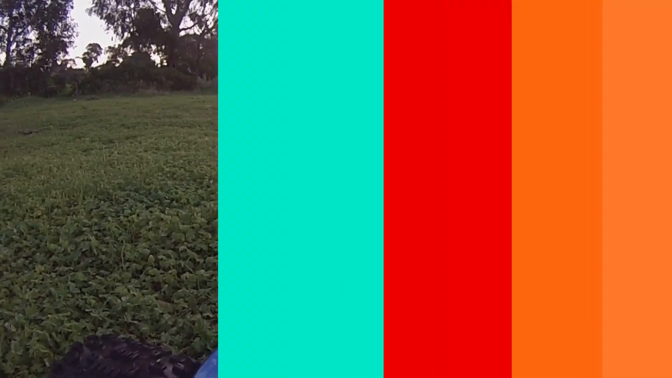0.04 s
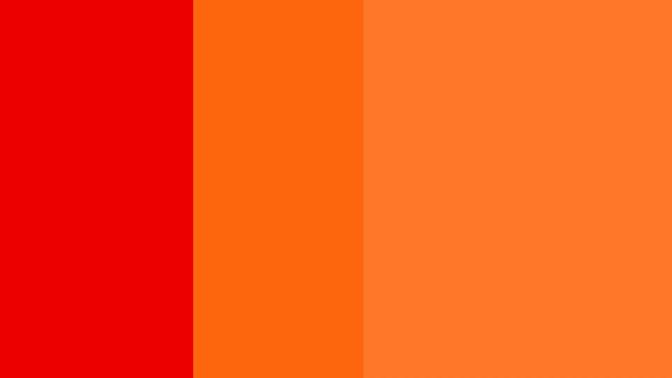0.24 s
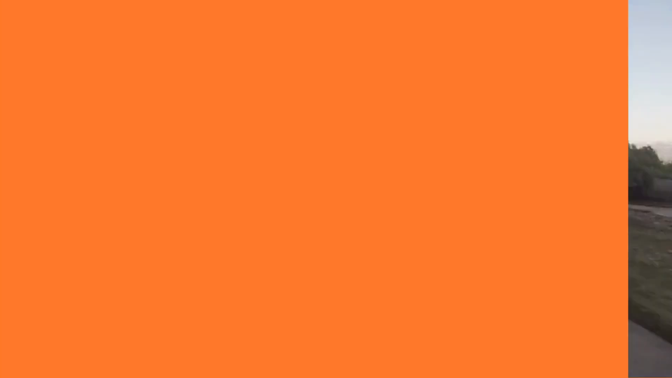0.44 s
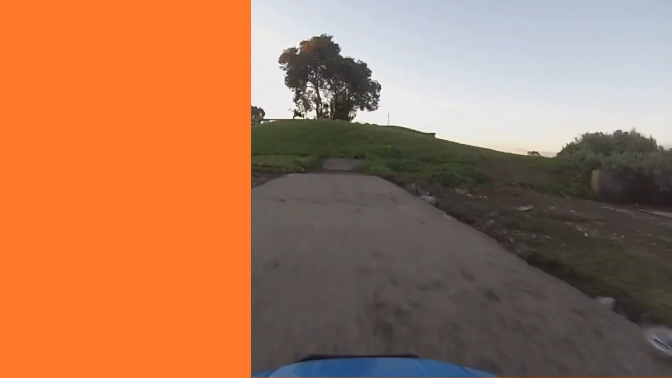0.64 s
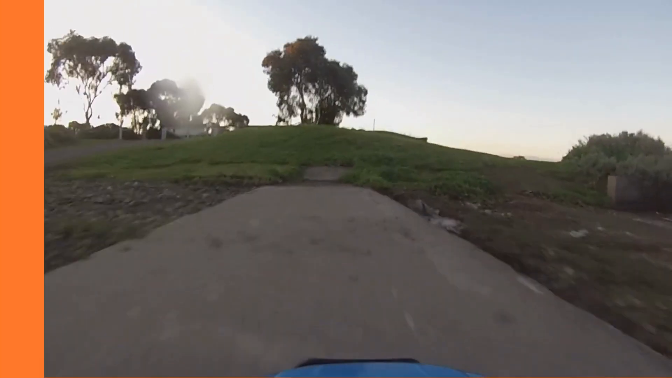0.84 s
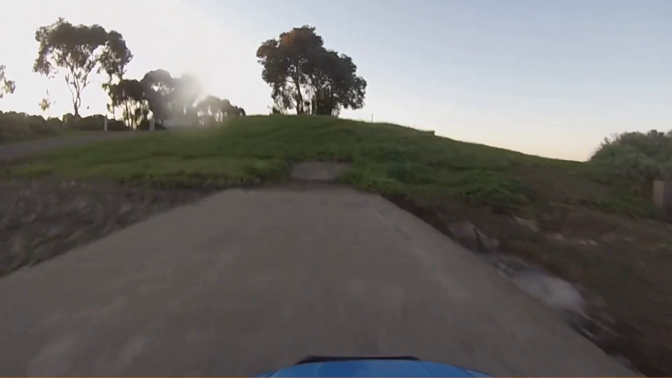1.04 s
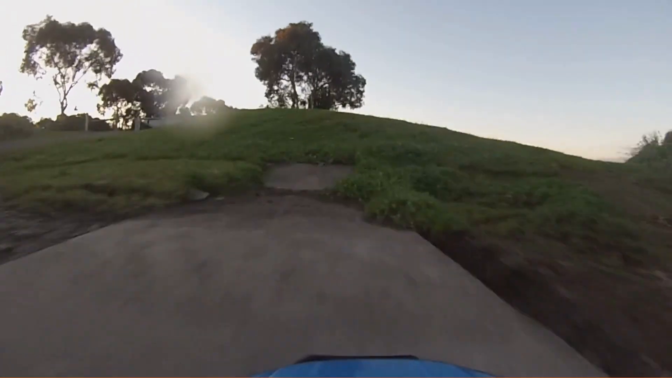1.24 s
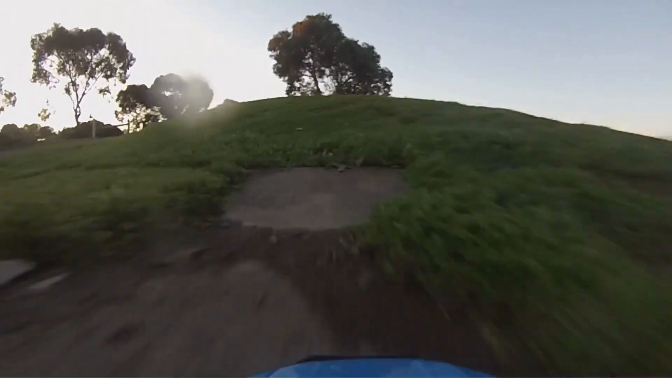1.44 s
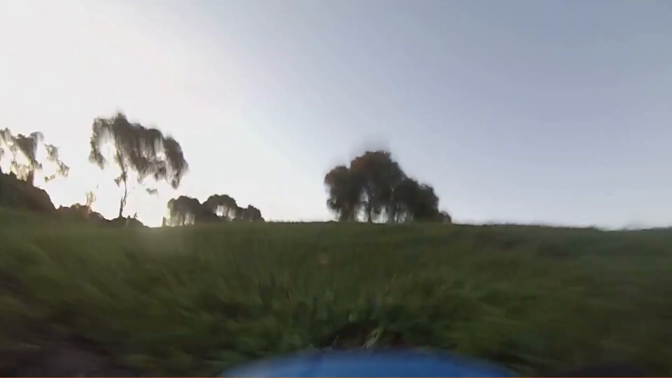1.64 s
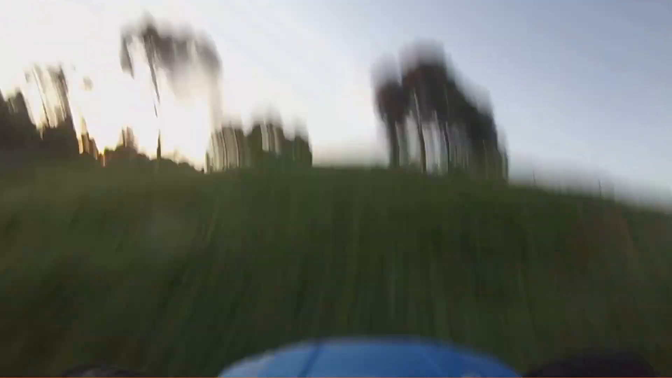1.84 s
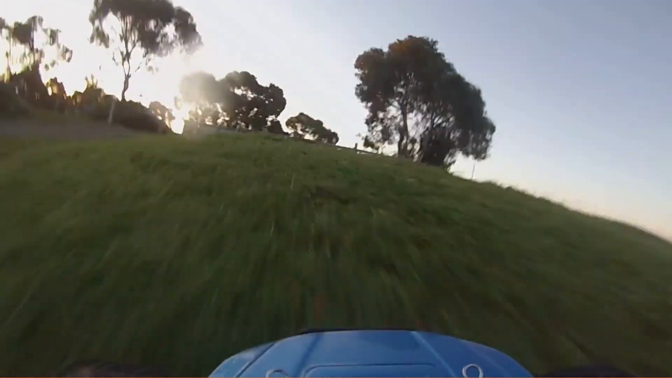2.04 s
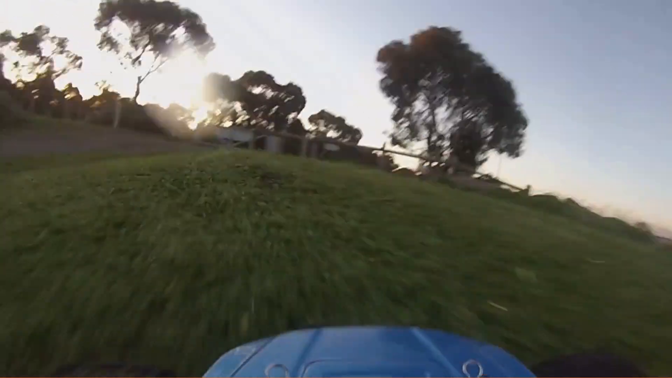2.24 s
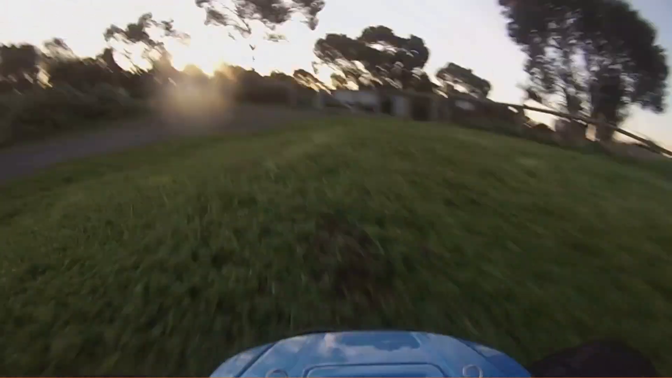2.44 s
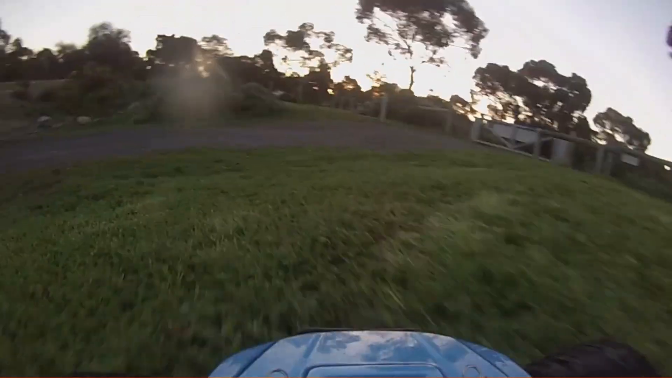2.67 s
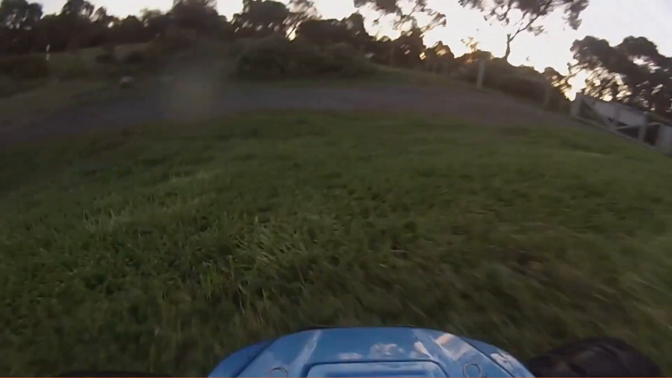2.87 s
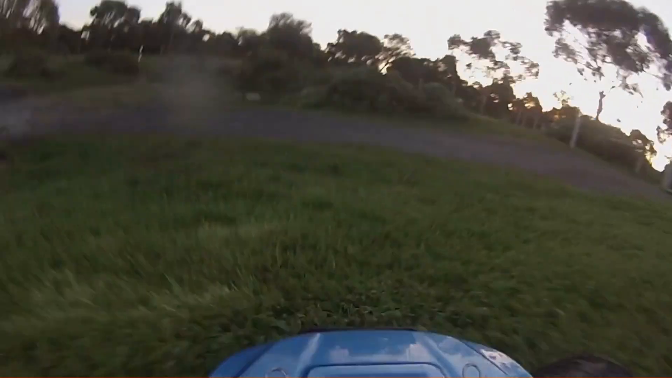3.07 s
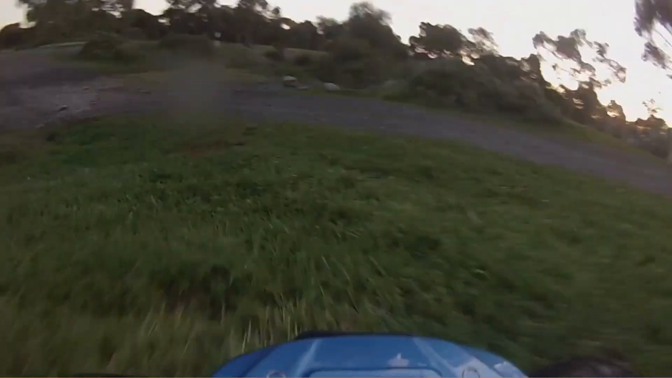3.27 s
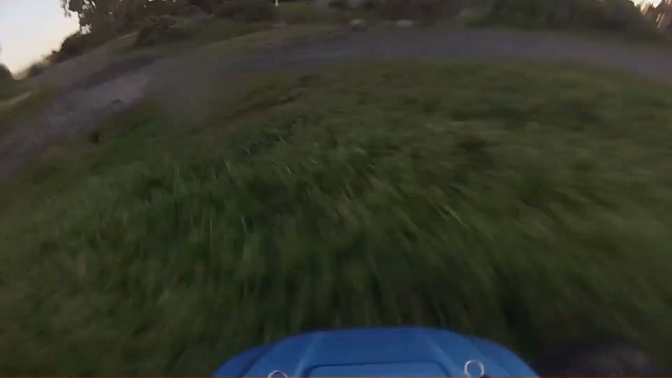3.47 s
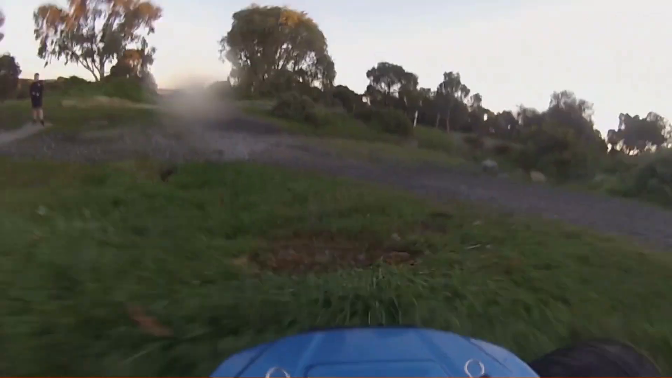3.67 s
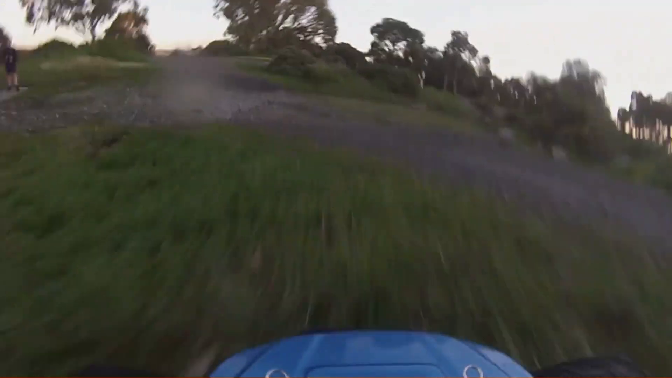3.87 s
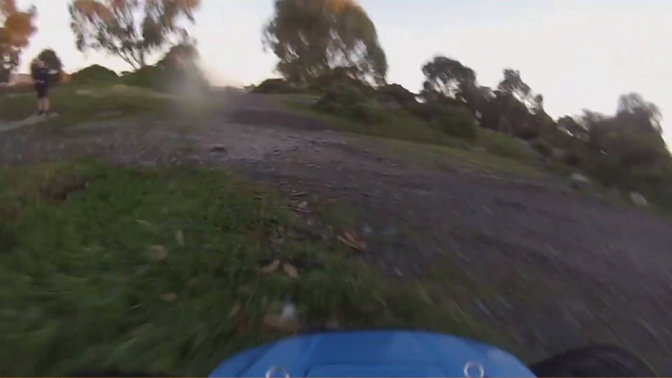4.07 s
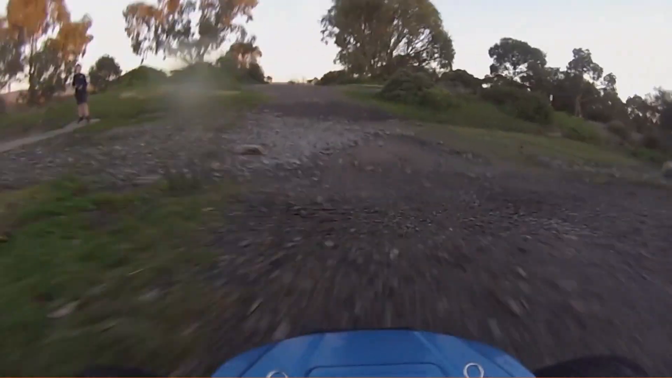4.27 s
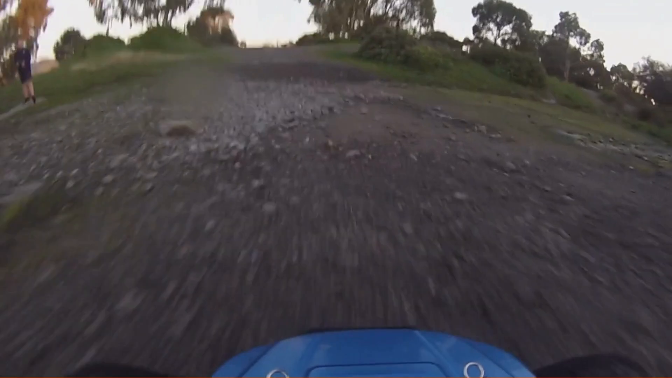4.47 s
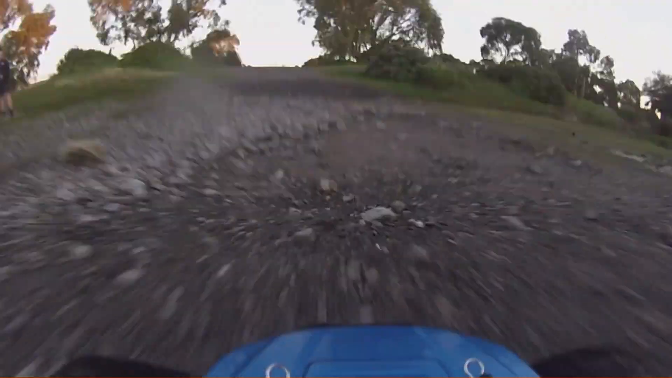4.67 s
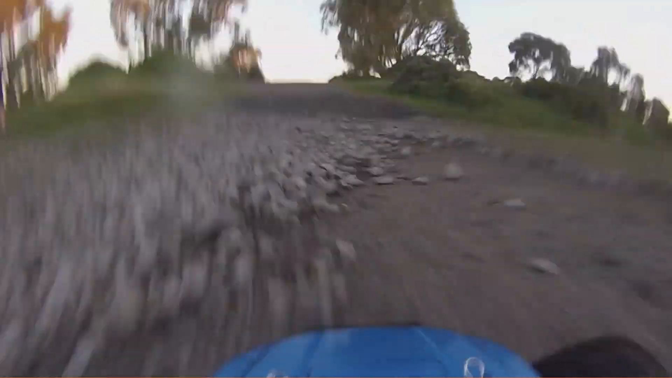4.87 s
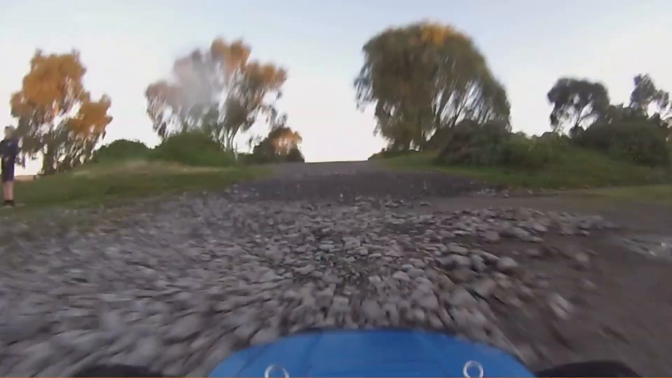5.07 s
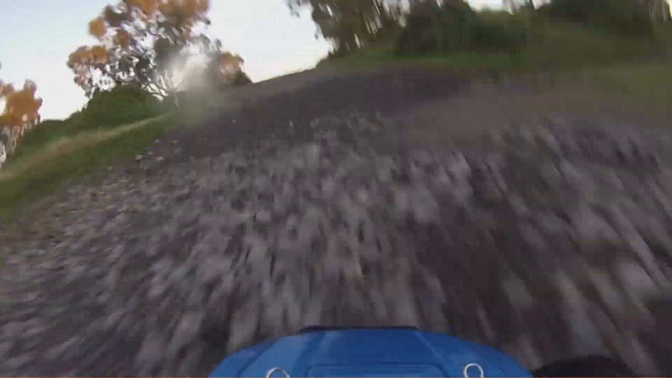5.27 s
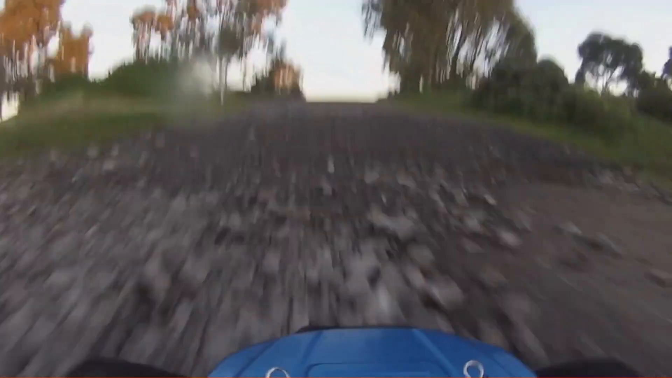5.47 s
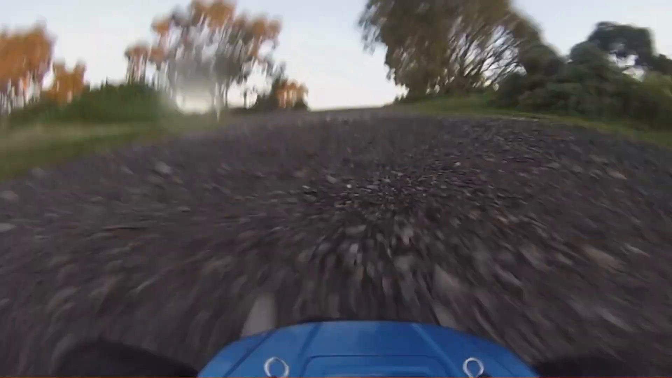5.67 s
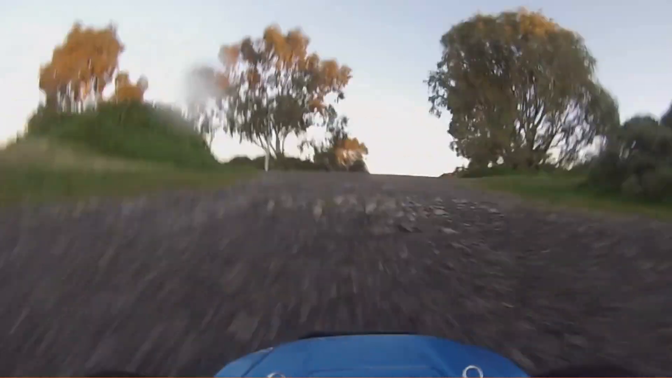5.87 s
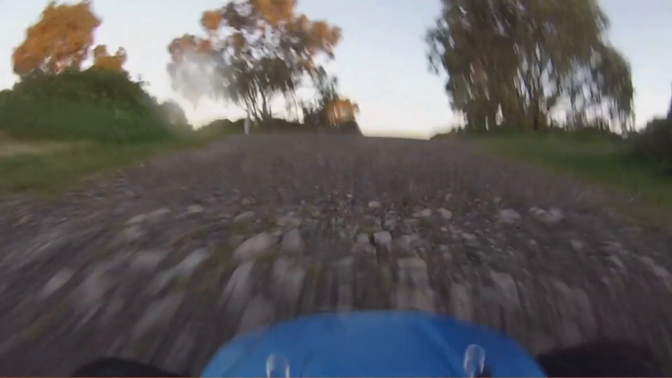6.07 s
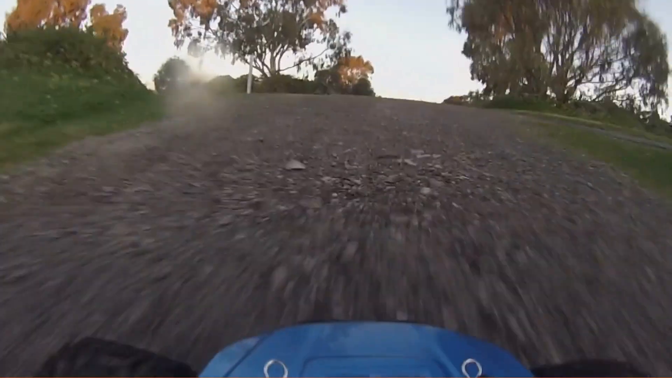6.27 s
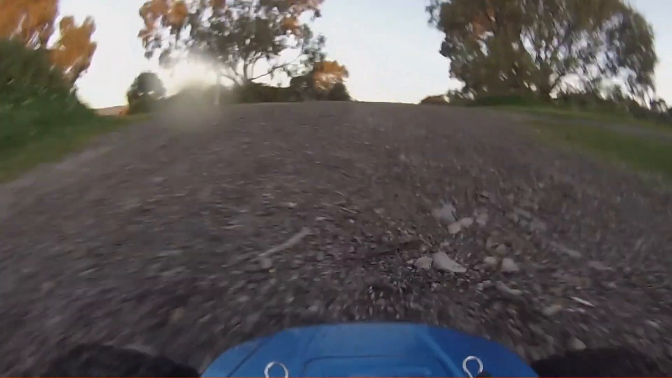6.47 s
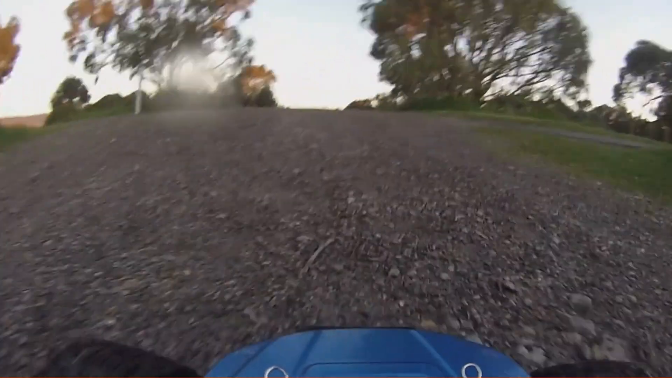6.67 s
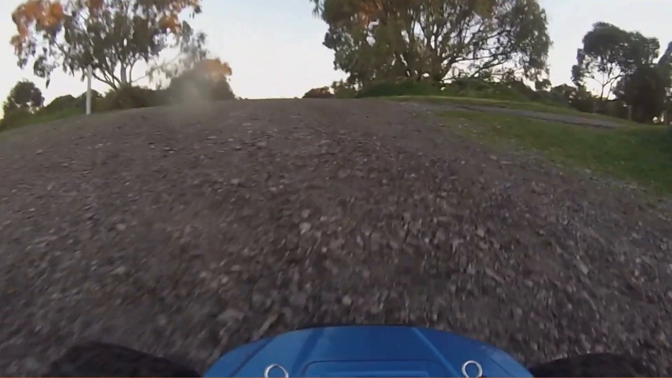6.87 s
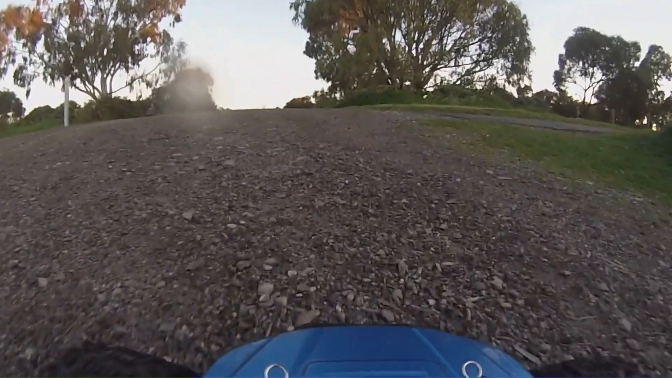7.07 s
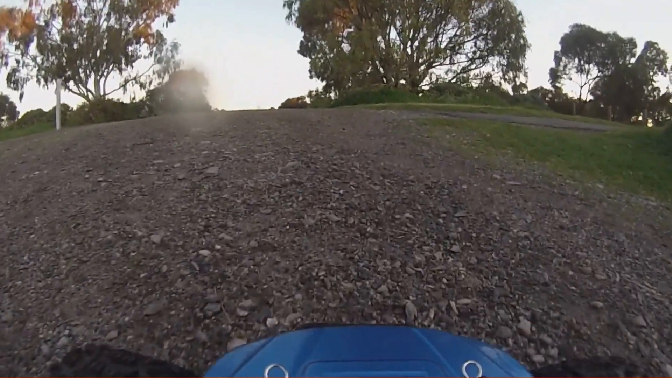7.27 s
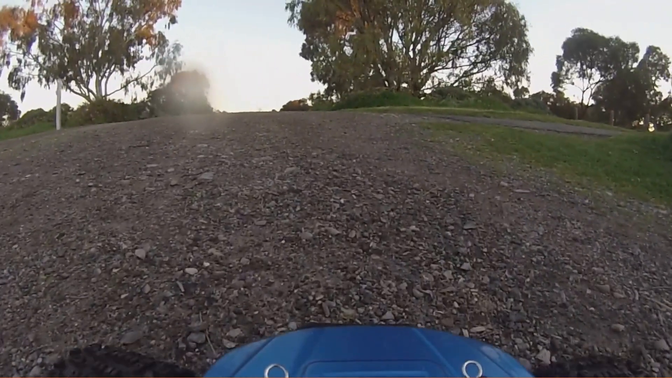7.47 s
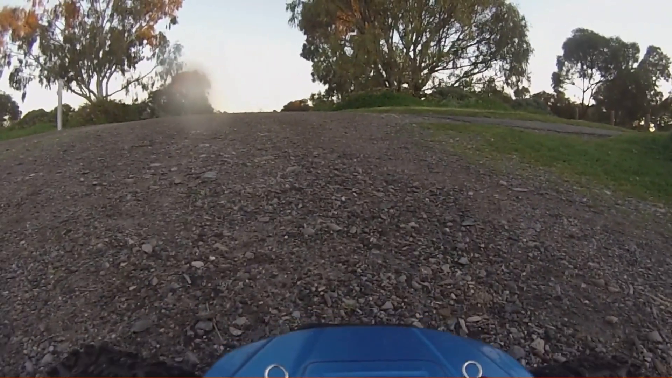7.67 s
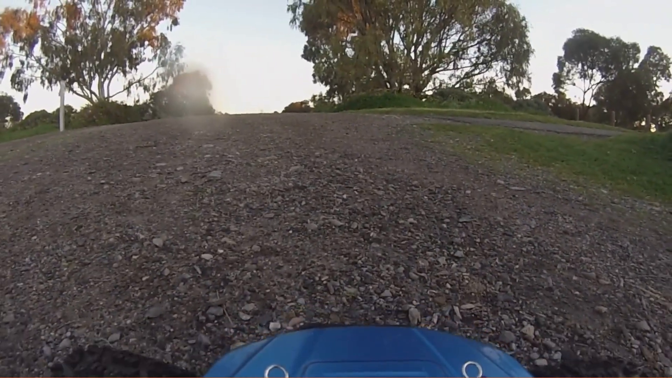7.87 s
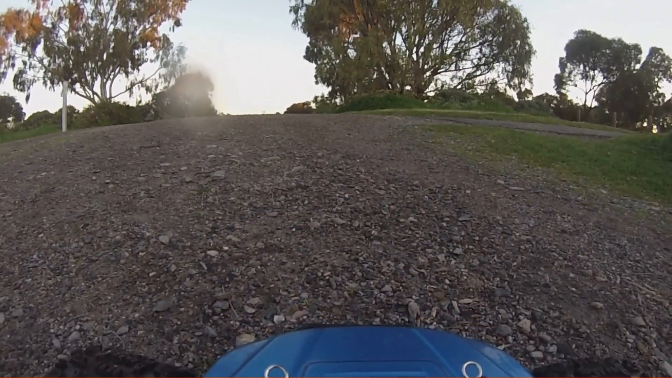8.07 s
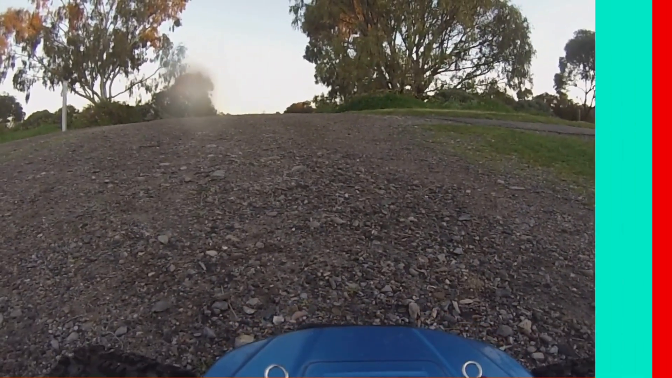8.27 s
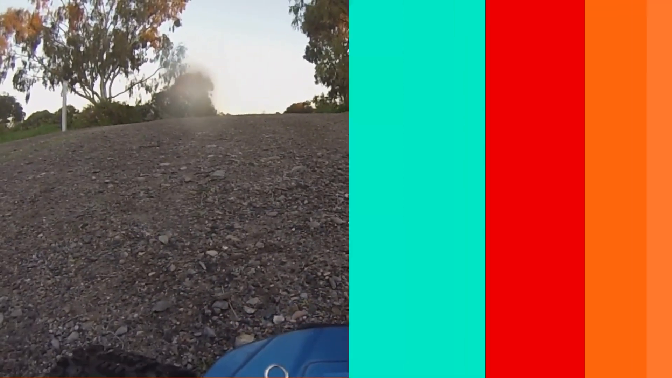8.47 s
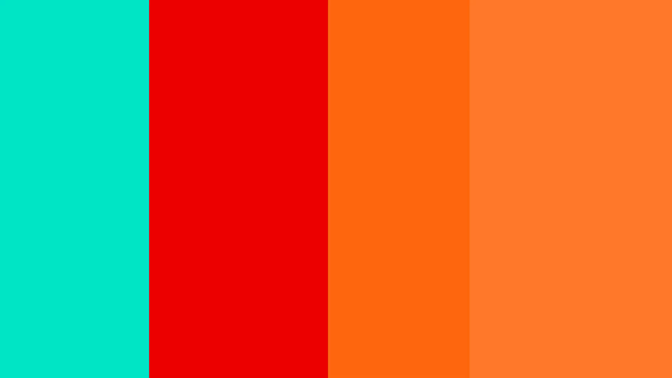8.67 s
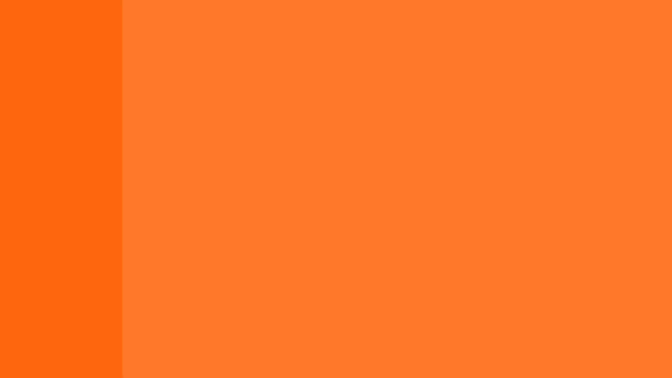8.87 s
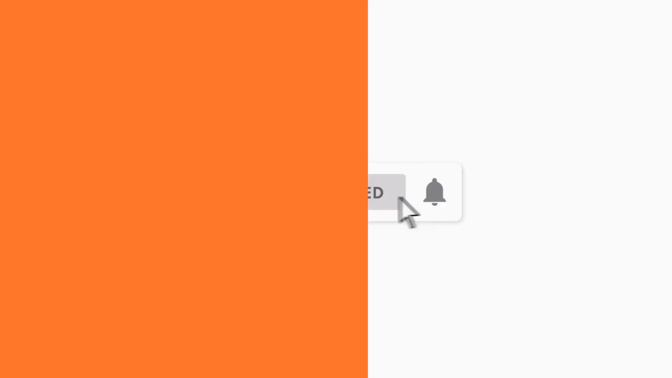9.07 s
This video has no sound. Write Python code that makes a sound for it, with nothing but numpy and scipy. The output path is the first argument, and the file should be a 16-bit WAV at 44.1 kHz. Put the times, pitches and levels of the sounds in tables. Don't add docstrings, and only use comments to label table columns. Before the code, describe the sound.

A microphone in a sealed housing bolted to a small electric model truck, in a quiet park. Faint air, then at 0.1 s a thin, high motor tone stuttering until 0.35 s. Shaft hum and gear whine climb from 0.4 to 1.6 s over concrete, with low mount shudder and boxy rattle. Heavy knocks and a crack at 1.6 s mark a hop onto grass; coasting grows calmer, with light ticks, until 2.9 s. Short whining pulls follow at 3 and 3.3 s, with deep jolts. From 4.3 s gravel gives dense bright rattle, pebble ticks and hard knocks, strong at 4.9 s; wheels briefly spin faster around 5.2 s. The loudest crack, at 5.66 s, makes the level duck. After 6.3 s the rattle thins into separate clicks, nearly still by 7.5 s. A small nudge clatters at 7.75 s, a low wobble rings at 8.1 s, and faint air fades with tiny ticks near 8.8 s.

```python
import sys
import numpy as np
from scipy import signal
from scipy.fft import rfft, irfft
from scipy.io import wavfile
from scipy.ndimage import uniform_filter1d

SR = 44100
rng = np.random.default_rng(int(sys.argv[2]) if len(sys.argv) > 2 else 0)


def unload_audio(sound):
    columns = np.transpose(np.atleast_2d(sound))
    steps = np.round(np.clip(columns, -1, 1) * 32767)
    wavfile.write(sys.argv[1], SR, steps.astype(np.int16))


def invert_db(level):
    return 10 ** (np.asarray(level, dtype=float) / 20)


N = 402177

# pitch in Hz, level in dB.
PARK_COLOUR = [(120, -4.5), (156, -6.5), (199, -13.5), (350, -11.5), (700, -15.5), (2690, -19.5),
               (5920, -26), (15000, -35.5)]
PARK_DB, FAR_HUM_HZ, FAR_HUM_DB = -64.5, 152, -68.5

# time in seconds, shaking in dB.
PACE = [(.062, -80), (.078, -31), (.26, -31), (.35, -23), (.84, -19), (1.05, -14), (1.64, -16),
        (1.9, -24.5), (2.63, -34.5), (2.9, -36.5), (2.99, -27.5), (3.4, -20.5), (4.2, -23.5), (5.6, -22),
        (6.76, -35), (6.96, -42), (7.53, -45.5), (7.55, -53.5)]
# start in seconds, time held
# low in seconds, how # much quieter the mount gets in dB, how much quieter the rattle gets in dB.
DIPS = [
    (1.647, .21, 14, 9.5),
    (4.9, 0.06, 2.5, 3),
    (5.667, 0.2, 6.5, 1.5),
]
DIP_RETURN_S = 0.023
CONCRETE_ENDS_S, CONCRETE_ROUGHNESS, SLAB_SWAY_DB = 1.5, 0.4, -1
CREEP_FROM_S, CREEP_ROUGHNESS = 6.65, 1.8
STILL_FROM_S = 7.545
NUDGE_S, NUDGE_DB, NUDGE_SWAY_DB, NUDGE_FADE_DB_PER_S = 7.735, -46.5, 10.5, 20
HALT_S, AT_REST_DB, DYING_DB_PER_S = 8.11, -63, 29
QUIETER_FROM_S, QUIETER_DB_PER_S = 8.68, 18

# pitch in Hz, width in Hz, level in dB.
MOUNT_MODES = [(24.6, 12, -0.5), (44, 12, 3), (67, 42, -11.5)]
CHASSIS_MODES = [(113.9, 49, 1.5), (163.5, 41.4, 1.5), (270, 48, -11.5), (438.7, 85, -4.5),
                 (523, 89, -10.5), (732, 80, -14), (625, 330, -17.5)]
HOUSING_MODES = [(1104, 110, 4.5), (1200, 180, 0.5), (1463, 240, -1.5), (1700, 170, -1), (1866, 99, 5.5),
                 (2040, 120, 4.5), (2220, 190, 0.5), (2397, 150, 4), (2675, 180, -0.5), (3400, 330, -12)]
SHELL_MODES = [(4188, 100, 10), (5330, 440, 5), (5975, 130, 10), (6960, 600, -5), (8200, 440, -8),
               (10310, 730, -13), (12500, 1000, -22.5), (13200, 600, -32.5)]
SEAL_HZ, BRIGHTER_PER_DB = 2850, 1
# pitch in Hz, width in Hz, share added (minus cancels).
AIR_PATH = [(2540, 140, -0.26), (3400, 290, 0.17), (3880, 220, -.6), (4160, 170, 0.25)]

# time in seconds, level in dB, stutter depth in dB.
CHOPPER = [
    (.065, -48, 7),
    (.2, -49, 23),
    (.24, -43.5, 11),
    (.355, -44, -6),
]
CHOPPER_HZ, STUTTER_HZ, STUTTER_PEAK_S = 4016, 31.4, 0.25

# start in seconds, peak in dB, ring pitch in Hz, contact length in ms.
GRASS_KNOCKS = [(0.0923, -29, 1220, 15), (0.186, -57, 1220, 15), (0.8452, -12, 2000, 5.2),
                (0.918, -12, 2260, 6.2), (0.9635, -12.5, 2450, 15), (1.0357, -20, 2390, 2.9),
                (1.5805, -5, 2080, 3.2), (1.5962, -0.5, 1740, 2.3), (1.6365, -3, 1730, 2),
                (1.7035, -13.5, 1880, 4.8), (1.869, 1.5, 1760, 1.7), (1.89, -19, 1820, 18),
                (2.172, -12, 1830, 7.1), (2.1817, -1.5, 1870, 5.4), (2.2266, -7, 2220, 1.9),
                (2.438, -14, 1820, 8), (2.462, -28, 1830, 20), (2.9489, -15.5, 1200, 6.8),
                (3.016, -15.5, 1570, 20), (3.0975, -13, 2320, 4.5), (3.1335, -32, 2300, 4.5),
                (3.4239, -11, 2340, 4), (3.5985, -3, 2040, 9.1), (3.6348, -7, 1790, 7),
                (3.6665, -8.5, 2300, 5.3), (3.8591, -10, 2200, 8.2), (3.897, -10.5, 2200, 7.9),
                (4.1236, -7, 1848, 4.2), (4.1786, -9.5, 2200, 6.9), (4.2275, -35, 1962, 4.5)]
GRAVEL_KNOCKS = [(4.3016, -12.5, 2070, 9.8), (4.335, -11, 1800, 11.5), (4.405, -5, 2280, 8.9),
                 (4.571, -16, 1934, 2.7), (4.5917, -13, 2040, 10), (4.6716, -9, 2100, 2.5),
                 (4.7545, -8, 1882, 3), (4.812, -11.5, 1890, 5), (4.8951, 3.5, 1815, 5),
                 (5.0239, -9.5, 1810, 2.2), (5.0477, -12.5, 1860, 4.2), (5.079, -12.5, 1760, 11),
                 (5.4088, -5, 1450, 2.5), (5.4242, 0.5, 2170, 2.3), (5.4594, -7.5, 1830, 5.1),
                 (5.548, -18.5, 2140, 4.4), (5.5795, -11, 2100, 15), (5.6548, -4.5, 2200, 3.7),
                 (5.6583, 9, 2000, 5.4), (5.702, -7.5, 1840, 2.4), (5.7377, -9, 1700, 1.9),
                 (5.772, -1.5, 2020, 2.4), (5.798, -16, 1860, 2.4), (5.939, -15.5, 2300, 15),
                 (6.084, -13.5, 1900, 11), (6.11, -9.5, 1870, 16.6), (6.1219, -6, 1740, 5),
                 (6.1474, -11.5, 2020, 8), (6.227, -1, 1790, 1.35), (6.307, -17.5, 1920, 13)]
MORE_KNOCKS = [(1.64, 3.5, 1750, 2.4), (1.647, 7, 2100, 2.9), (0.073, -35, 2300, 10),
               (3.2805, -23.5, 3300, 5.4), (3.539, -22, 2500, 5), (3.7788, -24, 2800, 5.6),
               (4.0515, -22, 2200, 5), (4.0948, -18, 2100, 5), (6.312, -18, 1920, 17),
               (6.3981, -26, 2230, 6.7), (6.435, -29, 1060, 6), (6.7563, -34, 1130, 6.2),
               (6.7848, -24.5, 2200, 5.5), (6.8306, -29, 2250, 3.7), (6.9275, -35, 1500, 7),
               (7.111, -37.5, 1870, 16), (7.2162, -33, 1890, 19), (7.2968, -36, 1930, 13),
               (7.36, -39, 2290, 6.6), (7.4043, -42, 1810, 8), (7.487, -47, 2320, 12), (7.5208, -38, 1884, 8),
               (8.7967, -43.5, 2097, 1.6), (7.8222, -36, 2000, 2)]
# start in seconds, peak in dB, ring pitch in Hz, contact in ms.
CHIRPS = [(0.515, -16, 1990, 5), (1.096, -15, 2700, 9.5), (1.155, -9, 2850, 7), (1.895, -14, 1710, 10),
          (2.9335, -27, 1220, 6.4), (3.2618, -19, 1950, 7), (3.3571, -22, 1990, 8.6),
          (3.505, -13, 1920, 12), (3.567, -13, 1600, 5.6), (3.727, -19, 1800, 7), (3.792, -23, 3300, 6),
          (3.84, -17, 1180, 16), (3.931, -19.5, 2011, 7.5), (4.2705, -13.5, 2380, 7.9),
          (4.386, -23, 2120, 4), (4.436, -14.5, 2100, 15), (4.4586, -12.5, 2130, 24),
          (4.477, -13, 2250, 6.5), (4.491, -10.5, 1830, 18), (4.494, -22, 3500, 7.9),
          (4.545, -16.5, 1175, 11), (4.573, -17, 3400, 5.5), (4.82, -11.5, 2080, 18),
          (4.919, -9.5, 2022, 5.2), (5.133, -14.5, 1830, 8.6), (5.146, -13, 2240, 6.6),
          (5.172, -12, 1860, 10), (5.5107, -15, 2130, 8.3), (5.6913, -4, 1850, 8.4),
          (6.2066, -19, 2420, 4.2), (2.474, -21, 1850, 10), (1.897, -21, 3350, 8), (3.6, -10, 2100, 9),
          (7.945, -42, 2300, 25), (1.825, -26, 2420, 29)]
# start in seconds, peak in dB, ring pitch in Hz.
SETTLING = [(6.6252, -16, 1810), (6.8468, -22.5, 1400), (7.174, -33, 1840), (7.638, -37, 1830),
            (7.6806, -42, 2220), (7.7432, -23.5, 1900), (7.7848, -37, 2010), (7.819, -29, 1990),
            (7.911, -46, 2200), (8.0, -54, 2100), (8.029, -41, 1900), (8.0704, -44.5, 1800),
            (8.762, -60, 2500), (8.772, -52.5, 2290), (8.783, -53, 1900), (8.796, -49.5, 2300),
            (8.807, -56, 2880), (8.818, -54, 1820), (8.8792, -55, 2030)]
SETTLING_MS, SETTLING_SHELL_DB = 11.6, -9
SHELL_LOSS_DB, SHELL_SHARE, DULL_SNAP_DB = -20.5, 0.7, -26.5

# start in seconds, peak in dB, snap against ring in dB.
STONES = [(1.1513, -18.5, -27), (1.6411, 6.5, 2.5), (1.6478, 4, 1), (1.673, -25, -14), (1.87, -13, 10.5),
          (1.8866, -25, -4), (2.165, -26.5, -14), (2.1814, -7, -11), (3.2231, -27, -27), (3.6352, -17, -6),
          (4.7053, -23, -29), (4.8944, 0.5, -10), (5.1333, -21.5, -27), (5.145, -28, -14),
          (5.41, -10.5, -39), (5.4236, -8.5, -10), (5.662, 12.5, -10), (5.7031, 4.5, -9),
          (5.7702, -11, -25), (5.8467, -6.5, -7.5), (6.1113, -22, -7), (6.2262, -6.5, -17),
          (6.7202, -30, -21), (5.659, -5, -15), (7.8215, -43, -14), (8.7965, -58, -20), (8.8792, -66, -18),
          (1.7035, -26, -8), (5.776, -19, -6)]
# start in seconds, peak in dB.
PEBBLES = [(1.8025, -28), (1.9714, -25.5), (2.1083, -22.5), (2.1407, -24.5), (2.34, -27.5), (4.373, -22),
           (4.5186, -22), (4.6448, -25), (4.8522, -22), (5.164, -17), (5.3138, -33), (5.3638, -30),
           (5.8696, -19), (5.9685, -24.5), (6.253, -27), (6.2846, -24), (6.3292, -30), (6.352, -26),
           (6.3794, -43), (6.4654, -28.5), (6.5121, -25.5), (6.5555, -40), (6.5735, -28), (6.6054, -26),
           (6.6444, -32), (6.6767, -35), (6.7903, -40), (6.8169, -53), (6.866, -38), (6.9207, -54),
           (1.987, -31), (2.315, -28), (2.404, -35), (2.527, -34), (2.564, -35), (2.655, -39), (2.695, -33),
          (2.8, -36), (2.884, -34), (2.985, -29)]
PEBBLE_KNOCK_DB, PEBBLE_HZ, PEBBLE_MS = 7, 2200, 5.8
PEBBLE_TICK_DB, PEBBLE_TICK_MS = -5, 11
# start in seconds, peak in dB, pitch in Hz.
FLICKS = [(3.6586, -20, 11100), (4.7513, -33, 11510), (4.8216, -22.5, 11500), (5.0162, -28, 11000),
          (5.0496, -28, 9600), (5.1145, -22, 12400), (5.1333, -40, 11000), (5.1454, -26, 11200),
          (5.1973, -25, 12000), (5.2816, -25.5, 12200), (5.5944, -28, 11000), (5.55, -39, 11500),
          (5.757, -34, 11000), (5.8174, -37, 12000), (6.0139, -46, 11500), (6.135, -30, 12500),
          (6.3272, -44, 9500), (1.6637, -38, 12500), (5.6545, -36, 10000), (5.6767, -46, 11960),
          (5.697, -35, 13060)]

# start in seconds, peak in dB, swing in Hz.
JOLTS = [(0.114, -22, 26.9), (0.386, -14, 51.1), (1.307, -57, 37.6), (1.401, -16.5, 35), (1.563, -11.5, 57),
         (2.094, -24.5, 40.5), (2.442, -15.5, 36.4), (2.541, -12, 42.2), (3.064, -23, 26.9),
         (3.066, 3.5, 37.4), (3.541, -3, 48.3), (3.858, 4, 27.4), (4.118, -8, 30), (4.451, -6.5, 56.4),
         (4.638, -8, 27.24), (4.744, -1.5, 35.3), (4.83, -3.5, 42), (5.493, -16, 38.64), (5.938, -11, 34.5),
         (6.097, -7, 67.3), (6.22, -34, 40.6), (6.468, -8, 51), (7.149, -10.5, 40), (7.729, -28, 37.7),
         (1.592, -6, 70), (1.92, -12, 62), (7.2, -14, 55.4)]
# start in seconds, peak in dB, swing in Hz, time to fall 60 dB in seconds.
LAST_SWING = (8.078, -11, 37, 1.0)

# time in seconds, shaft turns per second, shaft hum in dB, gear whine in dB.
SPIN_UP = [
    (.285, 15, -45, -38),
    (.325, 32, -36, -33),
    (.352, 42.5, -28, -32),
    (.375, 45, -25, -34),
    (.4, 54, -19, -46),
]
LAUNCH = [(.64, 57.5, -19, -46), (.675, 61, -20, -44), (.69, 62, -20, -21), (.75, 65.5, -21, -21),
          (.82, 73, -20, -20.5), (.94, 85.5, -22, -22), (1.08, 98.5, -22, -24), (1.2, 108.5, -22, -27),
          (1.35, 116, -23, -30), (1.42, 121, -25, -38), (1.56, 130, -30, -35), (1.645, 134, -36, -40)]
RESTART = [
    (2.92, 47, -43, -40),
    (2.95, 43, -40, -35),
    (3.03, 51, -36.5, -39.5),
    (3.075, 80, -45, -36),
]
SECOND_PULL = [
    (3.26, 44, -48, -38),
    (3.315, 54, -14, -31),
    (3.335, 62.35, -18, -19),
    (3.41, 84.5, -29, -22),
    (3.45, 81, -24, -25),
    (3.5, 86.5, -26, -24),
    (3.56, 99, -39, -23),
    (3.595, 97.5, -30, -31),
    (3.63, 96.1, -15, -53.5),
]
CRUISE = [
    (3.68, 76.3, -30, -26),
    (3.75, 96.75, -38, -35),
    (3.8, 102, -51, -32.5),
    (3.87, 96.4, -42, -33),
    (3.95, 79.5, -38.5, -42),
    (4.149, 70.83, -17, -25),
    (4.25, 75.74, -21, -72),
    (4.551, 77.2, -25.5, -36),
    (4.75, 84.3, -23.5, -40),
    (4.881, 89.3, -20.5, -44),
]
WHEELSPIN = [
    (5.19, 134, -50, -44),
    (5.24, 131, -60, -42),
    (5.3, 136, -45.5, -38.5),
    (5.4, 116, -45, -47),
]
# multiple of the shaft turns, level at full speed in dB.
SHAFT_ORDERS = [(1, 0), (2, -9), (3, -11), (4, -15)]
# multiple of the tooth rate, level in dB.
MESH_ORDERS = [(.5, -9), (1.5, -16), (2, -7), (3, -23)]
TEETH = 27.2
WHINE_FROM_HZ = 1100
COGGING_BELOW_TURNS, COGGING_DB = 56, 11
GEARBOX_HZ, GEARBOX_WIDTH_HZ, GEARBOX_DB = 730, 390, -31.5


def rms_one(x):
    return x / np.sqrt(np.mean(x ** 2) + 1e-20)


def in_time(rows):
    s, *columns = np.transpose(rows)
    return [np.interp(np.arange(N) / SR, s, c) for c in columns]


def while_on(rows, fade_s):
    t = np.arange(N) / SR
    return np.clip(np.minimum(t - rows[0][0], rows[-1][0] - t) / fade_s, 0, 1)


def drift(rate):
    r = np.exp(-40 * np.pi * rate / SR)
    slow = signal.lfilter([1], [1, -2 * r, r * r], rng.standard_normal(N // 20 + 4002))[4000:]
    return np.interp(np.arange(N) / 20, np.arange(len(slow)), rms_one(slow))


def resonance(x, hz, width_hz):
    r = np.exp(-np.pi * width_hz / SR)
    feedback = [1, -2 * r * np.cos(2 * np.pi * hz / SR), r * r]
    return signal.lfilter([(1 - r * r) / 2, 0, (r * r - 1) / 2], feedback, x)


def add(out, s, db, sound):
    at = round(s * SR)
    out[at:at + len(sound)] += sound / np.max(np.abs(sound)) * invert_db(db)


def contact(noise, ms):
    span = np.arange(len(noise)) * 1000 / SR / max(ms, .3)
    return noise * np.abs(noise) * np.minimum(span / 0.04, 1) * np.exp(-span ** 2.1)


def park():
    hz = np.maximum(np.arange(N // 2 + 1) * SR / N, 1)
    colour_hz, colour_db = np.transpose(PARK_COLOUR)
    colour = invert_db(np.interp(np.log(hz), np.log(colour_hz), colour_db)) * (hz > 120)
    air = rms_one(irfft(rfft(rng.standard_normal(N)) * colour, N))
    far_hum = rms_one(resonance(rng.standard_normal(N), FAR_HUM_HZ, 12))
    return invert_db(PARK_DB) * air + invert_db(FAR_HUM_DB) * far_hum


def stutter():
    return np.sin(np.pi * STUTTER_HZ * (np.arange(N) / SR - STUTTER_PEAK_S)) ** 2


def aftershake(events, dies_s, gain_db):
    push, fall = np.zeros(N), np.exp(-1 / (dies_s * SR))
    for s, db, *_ in events:
        push[round(s * SR)] += invert_db(np.clip(db, -30, -8) + gain_db)
    stirred = signal.lfilter([1], [1, -fall], push)
    return 20 * np.log10(1 + uniform_filter1d(stirred, size=400))


def ride(knocked):
    t = np.arange(N) / SR
    nudged_db = NUDGE_DB - NUDGE_FADE_DB_PER_S * (t - NUDGE_S)
    halted_db = AT_REST_DB - DYING_DB_PER_S * (t - HALT_S)
    pace_db = np.where(t < NUDGE_S, in_time(PACE)[0], np.where(t < HALT_S, nudged_db, halted_db))
    mount_db = -19 + 0.57 * (pace_db + 24.5) + 1.1 * np.minimum(pace_db + 60.0, 0)
    mount_db += NUDGE_SWAY_DB * (t > NUDGE_S) * (t < HALT_S)
    mount_db += SLAB_SWAY_DB * (t > SPIN_UP[-1][0]) * (t < CONCRETE_ENDS_S)
    pace_db = pace_db - 2.0 + aftershake(JOLTS, dies_s=0.023, gain_db=-3.5)
    pace_db += aftershake(knocked, dies_s=0.027, gain_db=-0.5)
    pace_db -= .5 * in_time(CHOPPER)[1] * stutter()
    for s, held_s, mount_quieter_db, quieter_db in DIPS:
        dipped = (t > s) * np.clip(1 - (t - s - held_s) / DIP_RETURN_S, 0, 1)
        mount_db = mount_db - mount_quieter_db * dipped
        pace_db = pace_db - quieter_db * dipped
    shell_db = -48.0 + 1.1 * (pace_db + 25)
    return [uniform_filter1d(db, size=300) for db in (mount_db, pace_db, shell_db)]


def rough_ground(bumps_per_s, spread_db, decay_s, rise_s):
    bumps = (rng.random(N) < bumps_per_s / SR) * invert_db(spread_db * rng.standard_normal(N))
    fall, rise = np.exp(-1 / (decay_s * SR)), np.exp(-1 / (rise_s * SR))
    falling = signal.lfilter([1], [1, -fall], bumps)
    return signal.lfilter([1 - rise], [1, -rise], falling)


def ground_force():
    t = np.arange(N)
    lumps = rough_ground(bumps_per_s=40, spread_db=5.5, decay_s=0.0092, rise_s=0.00074)
    pebbles = rough_ground(bumps_per_s=60, spread_db=5, decay_s=.002, rise_s=.0003)
    later = np.where(t < CREEP_FROM_S * SR, 1, CREEP_ROUGHNESS)
    surface = np.where(t < CONCRETE_ENDS_S * SR, CONCRETE_ROUGHNESS, later)
    surface[round(STILL_FROM_S * SR):round(NUDGE_S * SR)] = 0
    return 1 + surface * (lumps + 3.1 * pebbles)


def shaken(modes, shake, own_db, own_rate, grains_per_s, spread_db):
    out, flicker = 0, invert_db(own_db * drift(own_rate))
    struck = rng.random(N) < grains_per_s / SR
    size = invert_db(spread_db * np.minimum(rng.exponential(1, N), 4))
    impacts = struck * size * rng.standard_normal(N) + 1e-9
    for (hz, width_hz, db), shift in zip(modes, rng.integers(N, size=30)):
        rung = resonance(np.roll(impacts, shift), hz, 1.1 * width_hz)
        rung = resonance(rung, hz, 3 * width_hz)
        out = out + rms_one(rung) * np.sqrt(width_hz) * invert_db(db) * np.roll(flicker, shift)
    return rms_one(out * shake)


def shudder(mount_db):
    heavy = signal.butter(3, 95, fs=SR, output="sos")
    sway = shaken(MOUNT_MODES, 1, own_db=4.5, own_rate=4.1, grains_per_s=300, spread_db=-0.5)
    return invert_db(mount_db + 0.5) * signal.sosfilt(heavy, sway)


def drone(chassis_db, ground):
    modes = shaken(CHASSIS_MODES, ground ** 0.58, own_db=0.5, own_rate=1.0, grains_per_s=1500, spread_db=2.0)
    return invert_db(chassis_db) * modes


def rattle(housing_db, ground):
    modes = shaken(HOUSING_MODES, ground ** 0.64, own_db=2.5, own_rate=30, grains_per_s=4000, spread_db=-0.5)
    full = invert_db(housing_db - 2.0) * modes
    dull = signal.sosfiltfilt(signal.butter(3, SEAL_HZ, fs=SR, output="sos"), full)
    return dull + (full - dull) * invert_db(BRIGHTER_PER_DB * np.minimum(housing_db + 30.5, 0))


def grit(shell_db, ground):
    modes = shaken(SHELL_MODES, ground ** 0.93, own_db=1.5, own_rate=35, grains_per_s=3800, spread_db=2.5)
    return invert_db(shell_db - 3.5) * modes


def chopper():
    level_db, depth_db = in_time(CHOPPER)
    phase = 2 * np.pi * CHOPPER_HZ * np.arange(N) / SR
    tone = np.sin(phase) + invert_db(-30) * np.sin(2 * phase)
    return np.sqrt(2) * while_on(CHOPPER, .004) * invert_db(level_db - depth_db * stutter()) * tone


def knocks(events, width_share, broad_db, thud_db, lift_db):
    out = np.zeros(N + 2048)
    housing = signal.butter(3, [775, 3090], "band", fs=SR, output="sos")
    chassis = signal.butter(3, [151, 970], "band", fs=SR, output="sos")
    for (s, db, hz, ms), noise in zip(events, rng.standard_normal((len(events), 2048))):
        touch = signal.sosfilt(housing, contact(noise, ms))
        thud = signal.sosfilt(chassis, contact(noise, ms))
        sound = rms_one(resonance(touch, hz, width_share * hz))
        sound = sound + invert_db(broad_db) * rms_one(touch) + invert_db(thud_db) * rms_one(thud)
        tail = 0
        for (mode_hz, width_hz, mode_db), n in zip(HOUSING_MODES, noise):
            tail = tail + invert_db(mode_db + 7.9 * n) * resonance(touch, mode_hz, 0.77 * width_hz)
        add(out, s, db + lift_db, sound + invert_db(-10.5) * rms_one(tail))
    return out[:N]


def cracks(events, lift_db, short_ms, ms_per_db):
    out = np.zeros(N + 1024)
    shell = signal.butter(3, [3500, 6360], "band", fs=SR, output="sos")
    snap = signal.butter(3, [7200, 13000], "band", fs=SR, output="sos")
    for (s, db, snap_db), noise in zip(events, rng.standard_normal((len(events), 1024))):
        touch = contact(noise, short_ms + ms_per_db * max(db + 15.5, 0))
        ring = signal.sosfilt(shell, touch)
        ring = rms_one(ring + 1.5 * resonance(ring, 5760, 380))
        sharp = rms_one(signal.sosfilt(snap, touch + 1.5 * resonance(touch, 8200, 900)))
        add(out, s, db + lift_db, ring + invert_db(snap_db + 2.0) * sharp)
    return out[:N]


def jolts(t60_s, rise_s, lift_db):
    out, t = np.zeros(N + SR), np.arange(SR) / SR
    first = 1 + 2.1 * np.exp(-t / 0.011)
    for s, db, hz, t60 in [(*row, t60_s) for row in JOLTS] + [LAST_SWING]:
        envelope = first * invert_db(-60 * t / t60) * (1 - np.exp(-t / rise_s))
        add(out, s, db + lift_db, -envelope * np.sin(2 * np.pi * hz * t))
    return out[:N]


def drivetrain(rows, backlash):
    turns, hum_db, whine_db = in_time(rows)
    angle = 2 * np.pi * np.cumsum(turns * (1 + .004 * drift(12))) / SR
    hum = 0
    for k, db in SHAFT_ORDERS:
        growth = (turns / 125) ** (.7 * (k - 1))
        hum = hum + invert_db(db + 2.5 * drift(9)) * growth * np.sin(k * angle)

    looseness = backlash * (1 + 6 * np.clip(turns / 114 - 1, 0, 1))
    teeth = TEETH * angle + looseness * (drift(110) + 1.2 * drift(20) + .3 * np.sin(angle))
    throb = invert_db(whine_db) * (1 + .6 * np.sin(angle / 2) + .3 * np.sin(angle))
    throb = throb * invert_db(2 * drift(90) + 3 * (turns / 120) ** 3 * drift(25))
    whine = np.minimum(TEETH * turns / WHINE_FROM_HZ, 1) ** 3 * throb * np.sin(teeth)

    cogging_db = COGGING_DB * np.clip((COGGING_BELOW_TURNS - turns) / 8, 0, 1)
    partials = 0
    for k, db in MESH_ORDERS:
        partials = partials + invert_db(db + cogging_db * k / 2) * np.sin(k * teeth + .6 * drift(120))
    partials = throb * partials
    low = resonance(resonance(resonance(partials, 2100, 1300), 2100, 1300), 2100, 1300)
    middle = resonance(resonance(partials, 3300, 500), 3300, 500)
    high = resonance(resonance(partials, 5800, 800), 5800, 800)
    heard = low + invert_db(-9) * high + invert_db(-12) * middle
    return np.sqrt(2) * while_on(rows, 0.0098) * (invert_db(hum_db) * hum + whine + heard)


def gearbox(rows):
    rumble = resonance(rng.standard_normal(N), GEARBOX_HZ, GEARBOX_WIDTH_HZ)
    rumble = rms_one(resonance(rumble, GEARBOX_HZ, 2 * GEARBOX_WIDTH_HZ))
    level = invert_db(GEARBOX_DB + 3.82 * drift(25)) * (in_time(rows)[0] / 125) ** 2
    return while_on(rows, 0.013) * level * rumble


def flicks(ms, width_share):
    out = np.zeros(N + 512)
    bright = signal.butter(3, 7800, "high", fs=SR, output="sos")
    for (s, db, hz), noise in zip(FLICKS, rng.standard_normal((len(FLICKS), 512))):
        touch = signal.sosfilt(bright, contact(noise, ms))
        add(out, s, db, resonance(touch, hz, width_share * hz))
    return out[:N]


def blows():
    knocked = GRASS_KNOCKS + GRAVEL_KNOCKS + [(*row, SETTLING_MS) for row in SETTLING]
    echoed = []
    for s, db, *_ in knocked:
        settled_db = SETTLING_SHELL_DB * (s > SETTLING[2][0])
        echoed.append((s, SHELL_LOSS_DB + SHELL_SHARE * db + settled_db, DULL_SNAP_DB))
    small = PEBBLES
    ticked = [(s, db + PEBBLE_TICK_DB, DULL_SNAP_DB) for s, db in small]
    knocked = knocked + [(s, db + PEBBLE_KNOCK_DB, PEBBLE_HZ, PEBBLE_MS) for s, db in small] + MORE_KNOCKS
    out = knocks(knocked, width_share=0.14, broad_db=-5.5, thud_db=-9.5, lift_db=2.0)
    out += cracks(STONES + echoed, lift_db=1.5, short_ms=0.99, ms_per_db=0.12)
    out += knocks(CHIRPS, width_share=0.06, broad_db=-9.5, thud_db=-13, lift_db=1.5)
    out += cracks(ticked, lift_db=-7.5, short_ms=PEBBLE_TICK_MS, ms_per_db=4)
    return out + flicks(ms=1.9, width_share=0.49)


def scene():
    mount_db, housing_db, shell_db = ride(GRASS_KNOCKS + GRAVEL_KNOCKS)
    chassis_db = 0.2 * mount_db + 0.7 * housing_db - 7
    ground = ground_force()
    shaking = shudder(mount_db) + drone(chassis_db, ground)
    shaking = shaking + rattle(housing_db, ground) + grit(shell_db, ground)
    swings = jolts(t60_s=0.2, rise_s=0.0013, lift_db=-5.5)
    drive = chopper() + gearbox(LAUNCH)
    for rows in (SPIN_UP + LAUNCH, RESTART, SECOND_PULL + CRUISE):
        drive = drive + drivetrain(rows, backlash=.8)
    drive = drive + drivetrain(WHEELSPIN, backlash=.9)
    park_fade = invert_db(-QUIETER_DB_PER_S * np.maximum(np.arange(N) / SR - QUIETER_FROM_S, 0))
    return (park() * park_fade + shaking + blows() + swings + drive)[None]


def low_pass(x):
    return signal.sosfilt(signal.butter(12, 16480, fs=SR, output="sos"), x)


def record(dry):
    dry = dry + sum(share * resonance(dry, hz, width_hz) for hz, width_hz, share in AIR_PATH)
    ceiling_db = -1.5
    release_db = 154.0 * np.arange(N) / SR
    over_db = np.maximum(20 * np.log10(np.abs(dry[0]) + 1e-9) - ceiling_db, 0)
    duck_db = np.maximum(np.maximum.accumulate(over_db + release_db) - release_db, 0)
    duck_db = signal.lfilter([.02], [1, -.98], duck_db)
    rounded = .9 * np.tanh(dry * invert_db(-duck_db) / .9)
    top_cut = signal.cheby2(12, 80, 16550, fs=SR, output="sos")
    return low_pass(signal.sosfilt(top_cut, rounded))


dry = scene()
out = record(dry)
unload_audio(out)
```